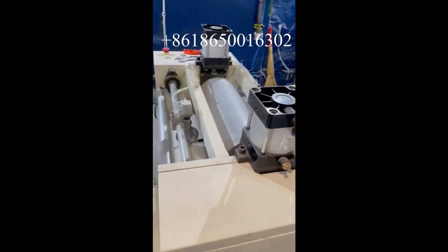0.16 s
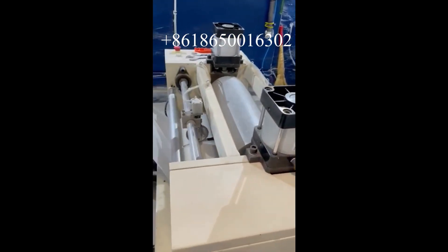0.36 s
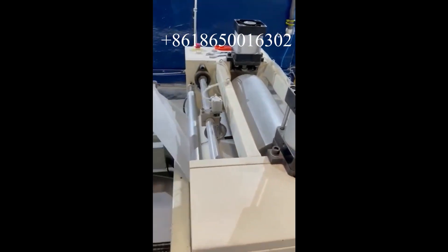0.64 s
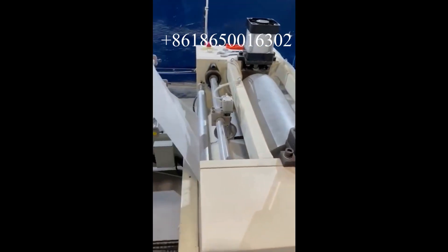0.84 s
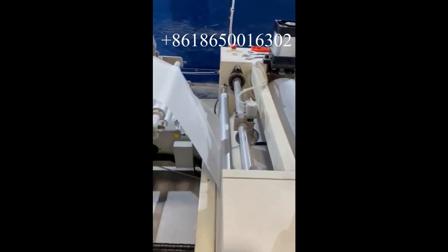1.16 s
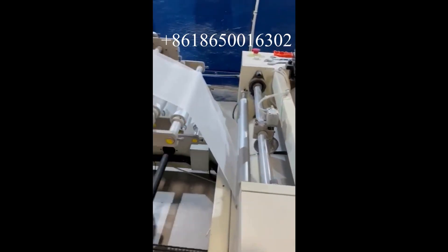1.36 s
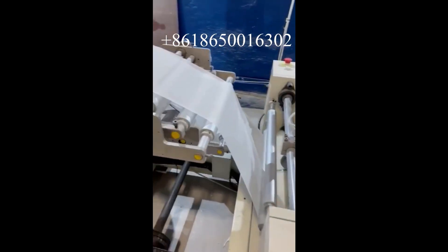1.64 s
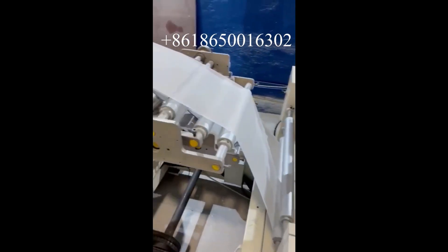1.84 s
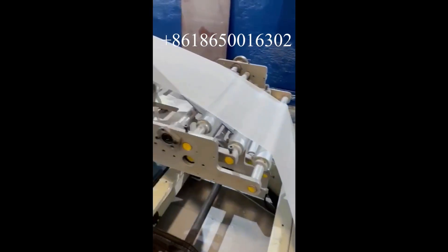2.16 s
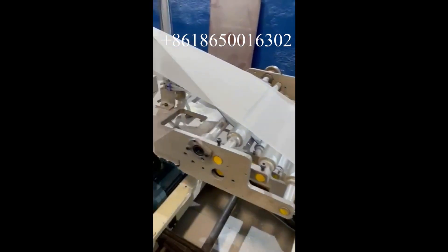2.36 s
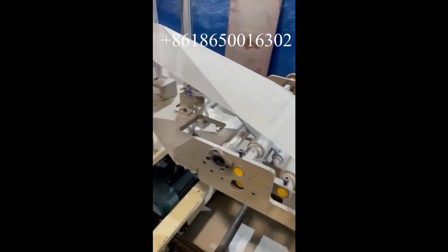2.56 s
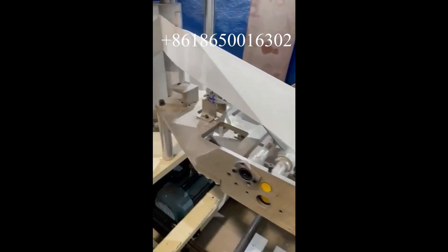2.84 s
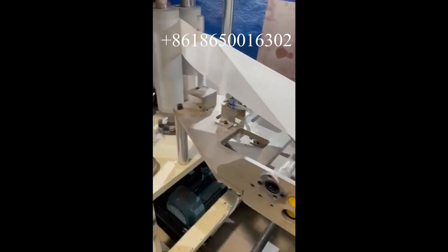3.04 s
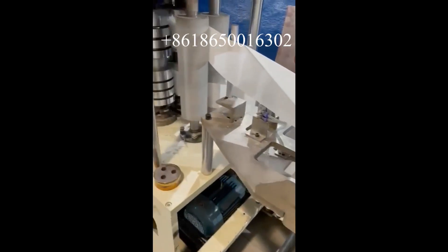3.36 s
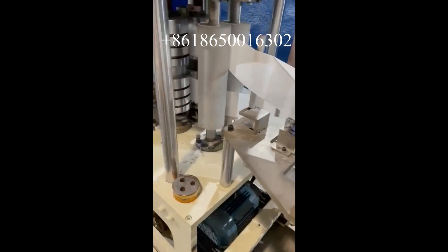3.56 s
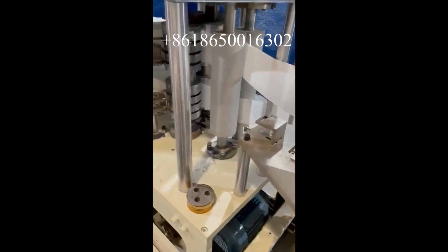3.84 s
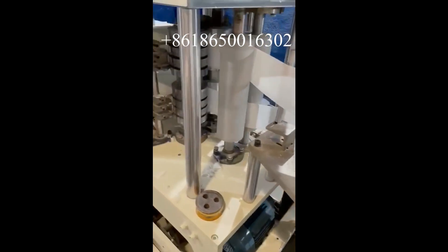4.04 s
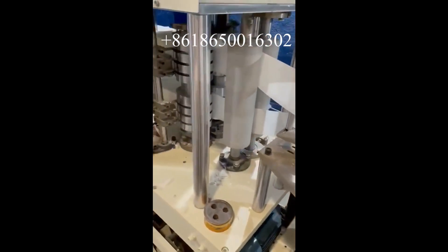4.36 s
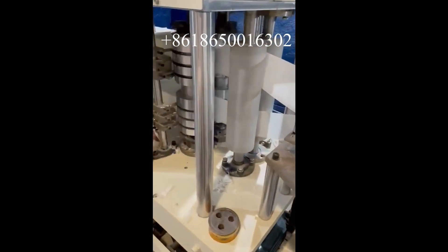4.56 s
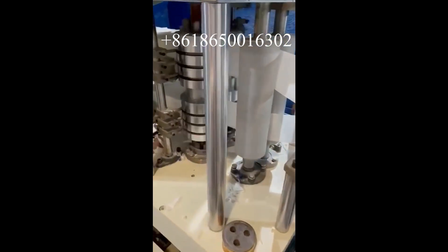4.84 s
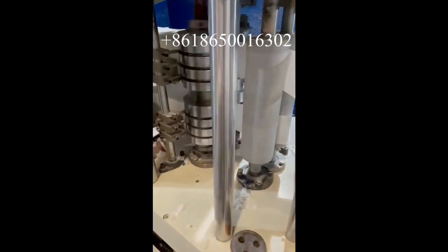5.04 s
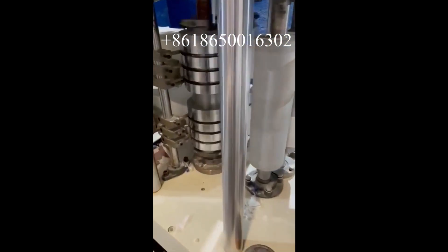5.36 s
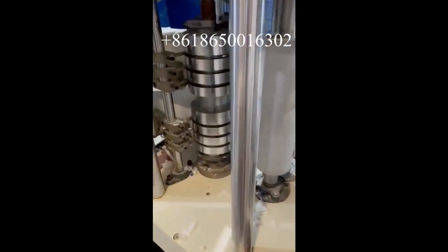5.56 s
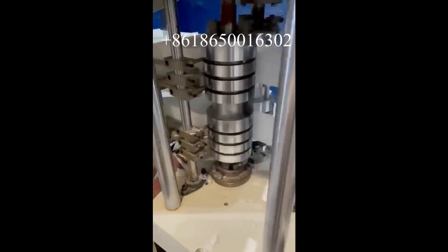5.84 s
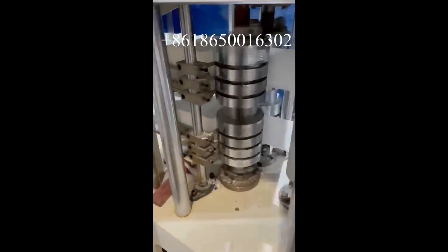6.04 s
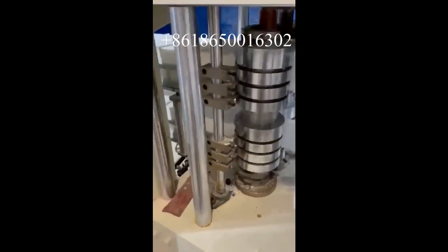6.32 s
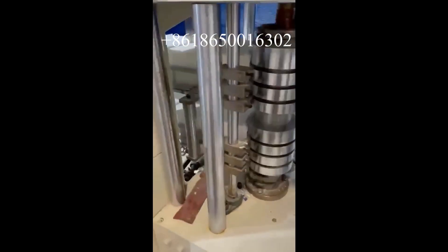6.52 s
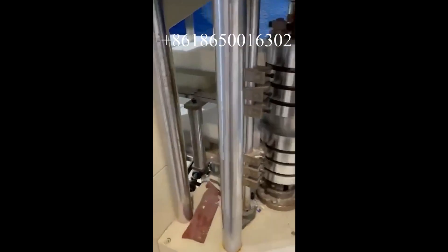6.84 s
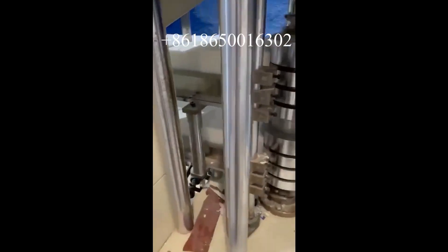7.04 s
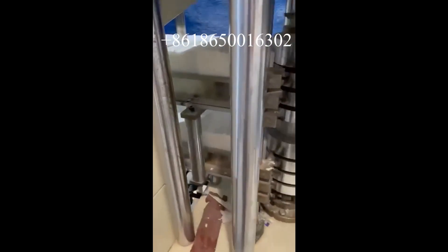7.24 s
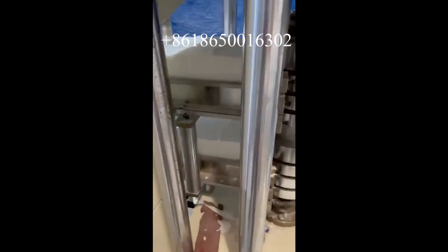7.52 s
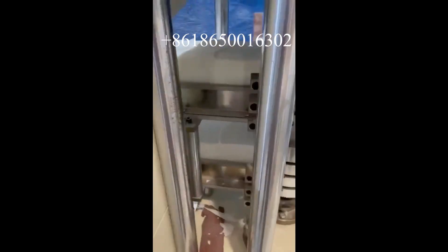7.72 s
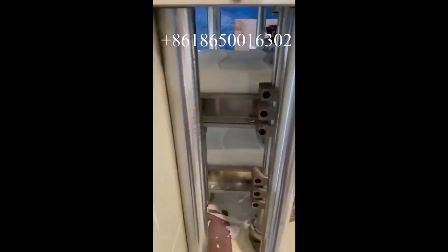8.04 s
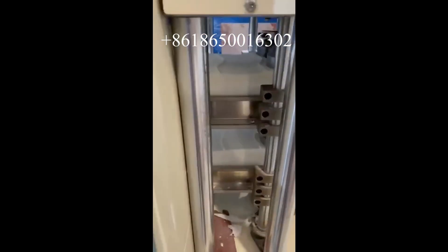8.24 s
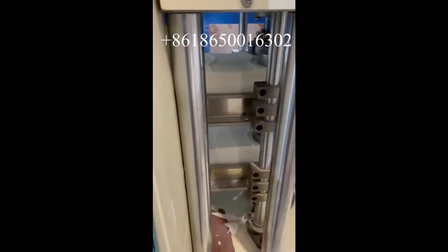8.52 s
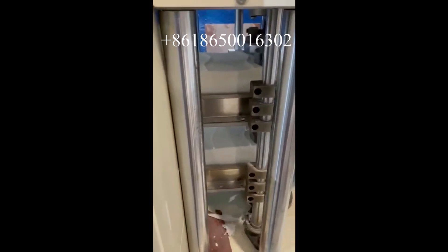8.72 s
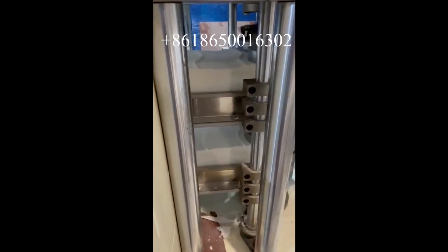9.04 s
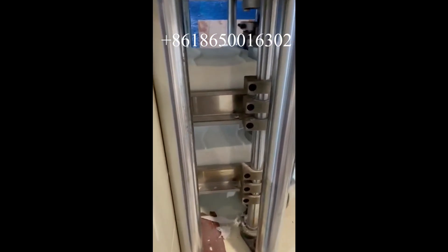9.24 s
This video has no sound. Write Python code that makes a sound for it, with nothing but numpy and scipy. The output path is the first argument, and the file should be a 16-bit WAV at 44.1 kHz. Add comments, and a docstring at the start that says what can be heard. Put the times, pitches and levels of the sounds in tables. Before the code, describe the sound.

A paper folding machine is already running at full speed in a workshop. Low gear rumble and hum throb about five times a second under hissing paper, while each cycle brings taps, paper snaps, clicks, knocks and a short swish. Just after five seconds a loose metal part rattles, the machine grows a little quieter, and a smaller rattle follows. The close handheld microphone moves from feed end to folding end.

```python
"""From the start, a paper folding and packing machine runs at five cycles a second in a workshop.
Its gear train shakes the frame with a rumble that repeats and throbs every turn, over hissing paper.
Each cycle brings a lever tap, a paper snap, a jaw click, a latch and cam knock, and a folding swish:
bursts of tiny impacts, loudest as a phone carried from feed end to folding end passes each part.
After 5 s a loose part clatters; the sound steps down a little as it ends, then a second clatter comes."""
import sys
import numpy as np
from scipy import signal
from scipy.fft import rfft, irfft, next_fast_len
from scipy.io import wavfile
from scipy.ndimage import map_coordinates

SR = 44100
rng = np.random.default_rng(int(sys.argv[2]) if len(sys.argv) > 2 else 0)


def to_wav(s):
    """Save 16-bit WAV."""
    ch = np.atleast_2d(s).T  # columns
    pcm = np.round(np.clip(ch, -1, 1) * 32767)  # PCM
    wavfile.write(sys.argv[1], SR, pcm.astype(np.int16))


N = 413658
TIME = np.arange(N) / SR  # seconds
CYCLE_HZ, CYCLE_S = 5.0178, 0.19923

# Levels along the walk, before the trims in each function. Each row: time in seconds, then the levels
# in dB of frame rumble, gear growl, roller ring, belt whirr and paper hiss.
LEVELS = [(0, -21.5, -20.5, -21, -26, -25.5), (1.6, -21, -19.5, -25, -26, -26),
          (3.6, -21, -20.5, -26, -27, -26), (5.12, -20.5, -20.5, -23.5, -28, -24.5),
          (5.3, -22.5, -23.5, -36, -31.5, -27.5), (6.3, -23.5, -21.5, -27, -32.5, -27),
          (6.9, -24.5, -19.5, -29.5, -33, -28), (7.9, -21, -21, -24.5, -34, -28),
          (8.4, -22.5, -22, -28, -35.5, -28), (9.38, -23, -21.5, -30, -33.5, -27)]
# Broad colours of the steady sounds. Each row: frequency in Hz, level in dB.
FRAME_COLOUR = [(20, -61), (45, -32), (70, -12.5), (100, -9.5), (130, -1), (200, 0.5), (250, -3.5),
                (330, -22.5), (700, -86.5)]
GEAR_COLOUR = [(120, -36), (220, -7), (280, -2.5), (390, -1.5), (430, -8), (480, -4), (540, -10),
               (700, -39.5), (1500, -56)]
ROLLER_COLOUR = [(300, -35.5), (500, -18), (560, -1), (590, 5), (625, 1.5), (690, -14), (1200, -48)]
BELT_COLOUR = [(300, -23), (520, -4.5), (680, -1), (850, -5.5), (1100, -11), (1350, -8), (1700, -20.5),
               (5000, -38)]
WEB_COLOUR = [(300, -13.5), (1000, 0), (1350, 2), (1650, 1.5), (2300, 4), (3000, -0.5), (4000, -4),
              (4700, -3), (6400, -10), (10500, -14.5), (12000, -30.5), (15000, -41)]

# The three main hums, as multiples of the cycle rate (no unit): low, middle and high.
HUM_MULTIPLES = (36, 70, 116)
# Steady hum levels along the walk. Each row: time in seconds, then low, middle and high hum in dB.
HUMS = [(0, -43, -26.5, -38), (1.7, -35.5, -30, -35.5), (3.4, -30, -32, -36), (4.9, -28.5, -31, -38),
        (5.7, -37, -42, -48), (7.3, -33, -34, -36), (9.38, -34, -33, -39)]
# Booms that return every cycle. Each row: seconds after the cycle start, multiple of the cycle rate,
# rise in seconds, decay in seconds, time when nearest in seconds, reach in seconds, peak level in dB.
THROBS = [(.204, 36, .022, .028, 4.7, 1.0, -18.5), (.204, 36, .02, .024, 1.3, 1.4, -23),
          (.13, 36, .02, .03, 4.6, .8, -23), (.122, 38, .022, .028, 7.2, 1.4, -21),
          (.005, 40, .02, .02, 7.6, 1.3, -23), (.063, 47, .014, .018, 4, 1.3, -22),
          (.066, 47, .016, .02, 7.1, .9, -19.5), (.008, 58, .014, .016, 2.5, 2.2, -23),
          (.056, 58, .014, .024, 1, 1.1, -22.5), (.089, 64, .013, .013, 4.5, 1.0, -17.5),
          (.08, 62, .01, .012, 1.2, 1.4, -23), (.087, 63, .012, .016, 7.6, 1.4, -22.5),
          (.02, 63, .014, .016, 7.8, 1.5, -22.5), (.027, 70, .01, .018, 1.2, 1.8, -18.5),
          (.116, 72, .01, .013, 1, 1.3, -22), (.153, 70, .012, .03, 1.1, 1.3, -18.5),
          (.166, 75, .016, .018, 4.5, .9, -22), (.186, 74, .014, .016, 7.8, 1.4, -24),
          (.053, 120, .005, .008, 2.8, 2.3, -20.5), (.093, 118, .006, .013, 3.4, 1.3, -19),
          (.12, 121, .007, .011, 1.5, 1.3, -24), (.191, 120, .005, .008, 3.2, 1.3, -23),
          (.16, 116, .007, .024, 3.3, 1.6, -19), (.162, 116, .008, .02, 8.2, 1.2, -19),
          (.192, 116, .006, .009, 8.2, 1.2, -23), (.058, 116, .008, .02, 8, 1.2, -24)]
# Lesser gear tones. Each row: multiple of the cycle rate, then the level in dB relative to their
# band at the feed end and at the folding end.
GEAR_TONES = [(35, -26, -17), (38, -19, -14), (46, -20, -16), (47, -17, -16), (51, -13, -21),
              (60, -14, -18), (64, -17, -18), (112, -13, -14)]

# How hard each cycle's strokes land. Each row: cycle start in seconds, then changes in dB for the tap,
# the snap, the knock (also latch and click), and the swish.
CYCLES = [(0.0003, -0.5, 1.0, 0.0, -1.0), (0.1995, -0.5, -1.0, -1.0, -1.0), (0.3988, 0.0, 0.5, -1.0, 0.5),
          (0.598, 0.0, -0.5, -1.0, -1.0), (0.7972, 1.0, -0.5, 0.0, -1.0), (0.9964, 1.0, 1.0, -1.5, 2.0),
          (1.1957, -1.5, -1.0, 1.5, 1.5), (1.3949, 0.5, -1.5, 1.0, 0.5), (1.5941, 0.5, -0.5, -0.5, -1.5),
          (1.7934, 0.5, 2.0, 1.0, -0.5), (1.9926, -1.0, 0.0, 0.5, -0.5), (2.1918, 0.0, 0.0, -0.5, -0.5),
          (2.3911, 1.0, 0.0, 0.0, 1.0), (2.5903, -1.0, 1.0, 0.0, -0.5), (2.7895, -2.0, 0.0, 1.0, 0.5),
          (2.9888, 1.5, -0.5, -1.5, 0.0), (3.188, -1.5, 0.0, 0.5, 0.0), (3.3872, -1.5, -0.5, 0.5, -0.5),
          (3.5864, 2.0, -1.5, 1.5, -1.5), (3.7857, 0.5, 0.5, 1.0, 0.5), (3.9849, 1.5, -0.5, -1.5, 1.0),
          (4.1841, 0.5, 0.0, -1.5, 0.5), (4.3834, -1.0, 1.5, -1.0, 1.0), (4.5826, 2.0, 2.5, 0.5, -1.0),
          (4.7818, 0.5, -1.5, 0.5, 1.0), (4.981, 0.0, 3.5, 0.0, 1.0), (5.1803, 1.0, -1.0, -0.5, 1.5),
          (5.3795, -1.5, -1.5, 0.5, 0.5), (5.5787, -0.5, -1.5, 1.5, -2.0), (5.778, -2.0, -0.5, -4.0, -1.5),
          (5.9772, 0.5, 1.0, 2.5, 1.0), (6.1764, 0.0, 0.5, 1.5, 0.0), (6.3757, 2.0, -0.5, 1.0, 1.5),
          (6.5749, 2.5, -1.5, 0.5, -1.5), (6.7741, -1.5, 0.0, -3.0, -0.5), (6.9733, -2.5, 2.0, 1.0, -1.0),
          (7.1726, -1.0, 0.0, 2.0, 3.0), (7.3718, -1.5, -1.5, -1.5, 2.0), (7.571, 1.5, 2.0, 1.5, -1.0),
          (7.7703, 1.5, -1.0, 1.5, 0.5), (7.9695, 0.5, 0.5, 0.0, 0.0), (8.1687, -1.0, -1.0, -3.0, -2.5),
          (8.368, 1.0, 0.0, 0.0, 0.5), (8.5672, -2.0, -1.0, 0.0, -2.0), (8.7664, 1.0, -0.5, 1.5, 0.0),
          (8.9656, 1.0, 1.0, 0.0, 1.0), (9.1649, -0.5, 0.5, -1.5, 0.0)]
# Contacts that make up each stroke. Each row: seconds after the cycle start, level in dB,
# rise in seconds, decay in seconds.
TAP = [(.042, 1.5, .0007, .0035), (.0452, 0, .001, .008)]
SNAP = [(.0805, -3.5, .0012, .004), (.087, 2, .0014, .003), (.0925, -1.5, .003, .009)]
LATCH = [(.1475, 0, .0014, .0045)]
KNOCK = [(.1485, 0, .0012, .004), (.1542, 2.5, .0015, .005), (.162, -2, .003, .012)]
CLICK = [(.1425, -8.5, .0015, .003), (.1478, -.5, .0013, .0032), (.153, 4, .0015, .003),
         (.159, -6.5, .002, .01)]
SWISH = [(.167, -7, .008, .012), (.1783, 0, .0014, .005), (.182, 1, .002, .005), (.186, .5, .002, .005),
         (.1945, 3.5, .0018, .004), (.200, -3.5, .002, .008)]
# Broad colours of the strokes. Each row: frequency in Hz, level in dB.
TAP_COLOUR = [(200, -11.5), (700, 6), (1400, 8.5), (2400, 1), (3200, -6.5), (5800, -7.5), (10500, -27),
              (15000, -30)]
SNAP_COLOUR = [(200, -14), (800, 19), (1700, 7.5), (2300, 16.5), (3000, 8), (4800, 11), (6400, 9),
               (10500, 1.5), (15000, -35)]
KNOCK_COLOUR = [(200, -7), (580, -2), (1000, -15.5), (1500, 1.5), (1900, -1), (2500, -9.5), (3500, -20),
                (7000, -21), (15000, -50)]
CLICK_COLOUR = [(200, -20.5), (1000, 2.5), (2000, 5.5), (2900, 4), (4500, -4), (6400, -4.5), (10500, -14),
                (15000, -45)]
SWISH_COLOUR = [(200, 2.5), (600, 15), (1400, 10.5), (2500, 12), (3000, 6.5), (3500, 8), (6400, 6),
                (10500, -4.5), (15000, -41)]
# Resonances of the struck parts. Each row: frequency in Hz, width in Hz, then the lift in dB heard
# from the feed end and from the folding end.
LEVER_MODES = [(1400, 89, 0, 7), (1800, 230, 4, 3), (3670, 130, 0, 9.5), (5500, 500, 3, 5.6)]
FOLDER_MODES = [(1330, 38, 5, 8.9), (2260, 360, 2, 3.7), (3460, 150, 3.9, 6.3), (4700, 130, 2.2, 9)]
CAM_MODES = [(1450, 90, 5, 5), (1850, 130, 10, 8)]
JAW_MODES = [(2900, 120, 4.4, 4.4), (3590, 460, 3, 6.4), (4700, 180, 11, 11.2), (5040, 230, 7, 4)]
GUIDE_MODES = [(2350, 400, 4.5, 1), (3580, 160, 3, 10), (4620, 280, 3, 7), (5350, 170, 5, 0.91)]
# Where the phone passes each part. Each single row: time when nearest in seconds, reach in seconds
# (its sign has no effect), direct level when nearest in dB, level heard everywhere in dB.
TAP_PASS = (5, -2, -20, -21)
SNAP_PASS = (7, 3, -20.5, -22)
LATCH_PASS = (8.5, -0.6, -21.5, -28.5)
KNOCK_PASS = (2.4, 1.6, -21, -27)
CLICK_PASS = (7.5, 2, -14.8, -38)
SWISH_PASS = (6.5, 3, -17.5, -26.5)
CAM_RING_PASS = (1.9, 1.4, -21, -38)
# Pings of the cam follower after its knock. Each row: frequency in Hz, level in dB,
# time to fall by 60 dB in seconds.
CAM_RING = [(1490, -7, .08), (1825, -3, .09), (1875, 0, .11)]
CAM_RING_S, CAM_RING_RISE_S = .149, .003  # delay after the cycle start, and rise
STROKES_DB = -.7
STEP_S, STEP_DB = 5.19, -3.5  # the strokes step down once

# Hits of the two clatters. Each row: time in seconds, level in dB, rise in seconds, decay in seconds.
CLATTER = [(5.159, -15, .0006, .002), (5.1642, -8.5, .0006, .003), (5.171, -8, .0006, .003),
           (5.175, -6.5, .0006, .0045), (5.183, -18, .002, .017), (5.463, -21, .002, .004),
           (5.4685, -9.5, .0006, .0035), (5.4745, -11.5, .0008, .0035), (5.481, -19, .002, .014)]
# Broad colour of the clatter. Each row: frequency in Hz, level in dB.
CLATTER_COLOUR = [(200, -25), (800, 7), (1400, 4.5), (2000, 9), (2800, 5.5), (4200, 1.5), (6400, -3),
                  (10500, -12.5), (12500, -20), (15000, -18)]
# Resonances of the clatter. Each row: frequency in Hz, width in Hz, lift in dB.
CLATTER_MODES = [(1854, 29, 11), (2820, 130, 1.6), (3190, 120, 8.5), (10060, 2200, 9.4)]
# Ringing of the loose steel part. Each row: frequency in Hz, level in dB,
# time to fall by 60 dB in seconds.
CLATTER_RING = [(1835, 7, 0.21), (3070, 4, 0.2), (3610, -9, 0.23), (3870, 1, 0.17)]
RING_DB = -8

# Treble level of the paper web along the walk. Each row: time in seconds, level in dB.
WEB_SHADE = [(0, -1.5), (3, -1), (5, -1.2), (5.7, -3.4), (9.38, -3.5)]
FLUTTER_HZ, FLUTTER_DB = 260, 1.4
COVER_DELAY_S, COVER_SWAY, COVER_DB = .0011, .25, -11  # sway: spread of the delay's natural log
ROOM_T60_S, ROOM_DB = 0.066, -7.5  # time to fall by 60 dB, and level
# Colour of faint air movement between the microphone ports. Each row: frequency in Hz, level in dB.
AIR_COLOUR = [(20, -12), (60, 7), (120, -13), (300, -32), (3000, -70)]
# Treble colour as heard: dips near 7.8 and 12.9 kHz and a falling top.
# Each row: frequency in Hz, level in dB.
HEARD_COLOUR = [(20, 0.5), (6500, -0.5), (7200, -41.5), (8400, -32), (9100, -2.5), (11400, 4), (12100, -13),
                (12900, -35), (14300, -9), (15500, -20)]
TOP_HZ = 15300


def gear_train(frame_db, gear_db, roller_db, belt_db):
    """Repeating tooth contacts shake the frame, gears, rollers and belts, each with its own colour."""
    frame = undb(frame_db - 5.0) * body(rattling(loose_db=9.0, slow_db=-3.5), FRAME_COLOUR)
    gears = undb(gear_db - 2.5) * body(rattling(loose_db=2, slow_db=-4.0), GEAR_COLOUR)
    rollers = undb(roller_db - 6.5) * body(rattling(loose_db=-1.0, slow_db=-7.0), ROLLER_COLOUR)
    belts = undb(belt_db + 3.5) * body(rattling(loose_db=5.5, slow_db=-4.5), BELT_COLOUR)
    return frame + gears + rollers + belts


def rattling(loose_db, slow_db):
    """Tooth contacts, a half-speed shaft and loose play; the pattern shifts as the listener moves."""
    angle = np.pi * TIME / TIME[-1]
    teeth = np.cos(angle) * one_turn() + np.sin(angle) * one_turn()
    half_speed_shaft = undb(slow_db) * one_turn(count=2)
    loose_play = undb(loose_db) * rng.standard_normal(N)
    return unit(teeth + half_speed_shaft + loose_play)


def one_turn(count=1):
    """Tooth contacts, as noise that comes back alike every count cycles."""
    size = int(round(count * SR / CYCLE_HZ))
    phases = 2j * np.pi * rng.random(size // 2 + 1)
    turn = irfft(np.exp(phases), size)
    return unit(np.resize(turn, N))


def hums():
    """Meshing teeth hum; each stroke's load makes them boom once a cycle, on stretches of the walk."""
    power = {multiple: undb(db) ** 2 for multiple, db in zip(HUM_MULTIPLES, curves(HUMS))}
    for s, multiple, rise, decay, nearest_s, reach_s, db in THROBS:
        # time since the boom's peak, wrapped to half a cycle either side
        age = (TIME - s + CYCLE_S / 2) % CYCLE_S - CYCLE_S / 2
        swell = np.exp(np.where(age < 0, -(age / rise) ** 2, -age / decay))
        near = np.exp(-.5 * ((TIME - nearest_s) / reach_s) ** 2)
        power[multiple] = power.get(multiple, 0) + (undb(db) * swell * near) ** 2
    return sum(np.sqrt(p) * tone(multiple, 0, waver_db=1.5, waver_rad=.5)
               for multiple, p in power.items())


def gear_tones(band_db, gain_db):
    """Lesser gear tones swell with their part of the drive; their balance changes along the machine."""
    place = TIME / TIME[-1]
    out = 0
    for multiple, feed_db, fold_db in GEAR_TONES:
        # frame below 260 Hz, gears up to 500 Hz, rollers above
        part_db = band_db[np.searchsorted([260, 500], multiple * CYCLE_HZ)]
        out = out + tone(multiple, part_db + feed_db + (fold_db - feed_db) * place)
    return undb(gain_db) * out


def tone(multiple, db, waver_db=3.0, waver_rad=0.41):
    """A tone of meshing teeth, locked to the cycle, wavering in level and pitch."""
    phase = 2 * np.pi * (multiple * CYCLE_HZ * TIME + rng.random()) + waver_rad * drift(6)
    return np.sqrt(2) * undb(db + waver_db * drift(4)) * np.sin(phase)


def all_strokes():
    """The six moving parts strike in every cycle and step down in level once."""
    tap, snap, knock, swish = range(1, 5)  # columns of CYCLES
    strokes = (stroke(TAP, TAP_COLOUR, LEVER_MODES, TAP_PASS, tap, grit_db=3.5)
               + stroke(SNAP, SNAP_COLOUR, FOLDER_MODES, SNAP_PASS, snap, grit_db=2.0)
               + stroke(LATCH, KNOCK_COLOUR, CAM_MODES, LATCH_PASS, knock, grit_db=-1.0)
               + stroke(KNOCK, KNOCK_COLOUR, CAM_MODES, KNOCK_PASS, knock, grit_db=4.0)
               + stroke(CLICK, CLICK_COLOUR, JAW_MODES, CLICK_PASS, knock, grit_db=3.0)
               + stroke(SWISH, SWISH_COLOUR, GUIDE_MODES, SWISH_PASS, swish, grit_db=3.0))
    return strokes * undb(STROKES_DB + STEP_DB * (TIME > STEP_S))


def stroke(pattern, colour, modes, place, column, grit_db,
           play_s=0.00031, scatter_db=-0.07, bright_db=1.6):
    """One part strikes once a cycle with a little play; its resonances shift in strength on the walk."""
    chance = rng.standard_normal((len(CYCLES), len(pattern), 2))
    rows = []
    for cycle, draws in zip(CYCLES, chance):
        for (s, db, rise, decay), (shift, hard) in zip(pattern, draws):
            if cycle[0] + s < N / SR:
                hit_s = cycle[0] + s + play_s * shift
                hit_db = cycle[column] + db + scatter_db * hard
                rows.append((hit_s, hit_db, rise, decay))
    force = contacts(rows) * grit(grit_db)
    at_feed = body(force, colour, [(hz, width, db) for hz, width, db, _ in modes])
    at_fold = body(force, colour, [(hz, width, db) for hz, width, _, db in modes])
    ring = passing(*place) * (at_feed + (at_fold - at_feed) * TIME / TIME[-1])
    # small parts radiate no deep bass
    ring = signal.sosfilt(signal.butter(2, 130, "high", fs=SR, output="sos"), ring)
    # no two blows land alike: one comes out brighter, the next duller
    dull = signal.sosfiltfilt(signal.butter(2, 3000, fs=SR, output="sos"), ring)
    tilt_db = bright_db * drift(20)
    return undb(-tilt_db / 2) * dull + undb(tilt_db) * (ring - dull)


def contacts(rows, size=6000, lead=1000):
    """Contacts swell briefly, peak and die away; their powers add (size and lead in samples)."""
    power = np.zeros(N + 2 * size)
    age = (np.arange(size) - lead) / SR
    for s, db, rise, decay in rows:
        start = max(int(s * SR), 0)
        shape = np.exp(-np.abs(age) / np.where(age < 0, rise, decay))
        power[start:start + size] += (undb(db) * shape) ** 2
    return np.sqrt(power[lead:lead + N])


def grit(spread_db):
    """Dense tiny impacts of unequal size."""
    chance = rng.standard_normal((2, N))
    return unit(chance[0] * undb(spread_db * chance[1]))


def passing(nearest_s, reach_s, near_db, far_db):
    """Direct sound falls with distance as the phone walks by, over a level that fills the room."""
    distance = np.hypot(1, (TIME - nearest_s) / reach_s)
    return np.hypot(undb(near_db) / distance, undb(far_db))


def cam_ring():
    """Each knock leaves a short, clear ping in the cam follower, with a slightly varying pitch."""
    out = np.zeros(N + SR)
    age = np.arange(SR // 8) / SR
    chance = rng.standard_normal((len(CYCLES), len(CAM_RING)))
    for (start, _, _, force_db, _), draws in zip(CYCLES, chance):
        ping = 0
        for (hz, db, t60), detune in zip(CAM_RING, draws):
            wave = np.sin(2 * np.pi * hz * (1 + .006 * detune) * age)
            ping = ping + undb(db - 60 * age / t60) * wave
        first = int((start + CAM_RING_S) * SR)
        out[first:first + len(age)] += undb(force_db) * ping * (1 - np.exp(-age / CAM_RING_RISE_S))
    return passing(*CAM_RING_PASS) * out[:N]


def clatter(size=16384):
    """A loose part rattles hard, and its steel rings on briefly."""
    force = contacts(CLATTER) * grit(4.5)
    age = np.arange(size) / SR
    ring = sum(undb(db - 60 * age / t60) * np.sin(2 * np.pi * hz * age)
               for hz, db, t60 in CLATTER_RING)
    rattle = body(force, CLATTER_COLOUR, CLATTER_MODES)
    ringing = signal.oaconvolve(force, ring / np.linalg.norm(ring))[:N]
    return rattle + undb(RING_DB) * ringing


def paper_web(web_db):
    """The paper web flutters and hisses over its guides, as dense tiny crinkles of uneven level."""
    flutter_db = 1.0 * drift(11) + FLUTTER_DB * drift(FLUTTER_HZ)
    hiss = undb(web_db + flutter_db) * body(grit(5.2), WEB_COLOUR)
    return shaded(off_covers(hiss))


def shaded(x):
    """The folding tower screens the treble of the paper web."""
    dull = signal.sosfiltfilt(signal.butter(2, 1900, fs=SR, output="sos"), x)
    return dull + undb(curves(WEB_SHADE)[0]) * (x - dull)


def off_covers(x):
    """A steel cover echoes once; the delay shifts as the phone moves and hollows out changing bands."""
    delay_s = COVER_DELAY_S * np.exp(COVER_SWAY * drift(1.5))
    echo = map_coordinates(x, [(TIME - delay_s) * SR], order=3, mode="mirror")
    return (x + undb(COVER_DB) * echo) / np.hypot(1, undb(COVER_DB))


def workshop(x, size=16384, count=7):
    """Reflections from covers and walls; their pattern changes from place to place along the walk."""
    age = np.arange(size) / SR
    out = 0
    for k in range(count):
        fade = undb(-60 * age / ROOM_T60_S) * (1 - np.exp(-age / 0.0029))
        tail = rng.standard_normal(size) * fade
        # neighbouring places crossfade along the walk
        share = np.sqrt(np.maximum(1 - np.abs(TIME / TIME[-1] * (count - 1) - k), 0))
        out = out + share * signal.oaconvolve(x, tail / np.linalg.norm(tail))[:N]
    return out


def port_air():
    """Faint air movement between the microphone ports, as low steady noise."""
    return undb(-75) * body(rng.standard_normal(N), AIR_COLOUR)


def body(x, points, modes=(), size=4096):
    """Causal filter of unit power: a broad colour with resonances standing out of it."""
    f = np.arange(size // 2 + 1) * SR / size + 1
    hz, db = np.transpose(points)
    gain = undb(np.interp(np.log(f), np.log(hz), db))
    for centre, width, lift_db in modes:
        gain = gain * (1 + (undb(lift_db) - 1) / (1 + (2 * (f - centre) / width) ** 2))
    # folding the cepstrum makes the filter respond as early as it can (minimum phase)
    cepstrum = irfft(np.log(gain))
    cepstrum[1:size // 2] *= 2
    cepstrum[size // 2 + 1:] = 0
    response = irfft(np.exp(rfft(cepstrum)))
    return signal.oaconvolve(x, response / np.linalg.norm(response))[:N]


def drift(rate):
    """Random wander with a spread near 1, in straight lines between rate new values a second."""
    knots = rng.standard_normal(int(N / SR * rate) + 2)
    return 1.41 * np.interp(TIME * rate, np.arange(len(knots)), knots)


def curves(rows):
    """Each column of a table, joined by straight lines in time."""
    s, *columns = np.transpose(rows)
    return [np.interp(TIME, s, c) for c in columns]


def unit(x):
    """Scale to an rms (average strength) of 1."""
    return x / np.sqrt(np.mean(x ** 2))


def undb(db):
    """Decibels to gain."""
    return 10 ** (np.asarray(db) / 20)


def scene():
    """The whole machine, almost in the middle; the treble leans right and spreads a little."""
    frame_db, gear_db, roller_db, belt_db, web_db = curves(LEVELS)
    drive = gear_train(frame_db, gear_db, roller_db, belt_db) + hums()
    drive = drive + gear_tones([frame_db, gear_db, roller_db], gain_db=1)
    impacts = off_covers(all_strokes()) + clatter()
    mid = drive + impacts + cam_ring() + paper_web(web_db) + undb(ROOM_DB) * workshop(impacts)
    treble = signal.sosfiltfilt(signal.butter(3, 950, "high", fs=SR, output="sos"), mid)
    spread = undb(-23.5) * workshop(treble, count=2)
    lean_right = -undb(-24.5) * treble
    side = spread + lean_right + port_air()
    return np.array([mid + side, mid - side])  # left, right


def record(dry):
    """The highest peaks are rounded, the treble has two dips, and the top is cut."""
    size = next_fast_len(N + 4096)
    hz, db = np.transpose(HEARD_COLOUR)
    gain = undb(np.interp(np.arange(size // 2 + 1) * SR / size, hz, db))
    rounded = dry / (1 + (dry / .85) ** 4) ** .25
    heard = irfft(rfft(rounded, size) * gain, size)[:, :N]
    return signal.sosfilt(signal.ellip(8, .2, 70, TOP_HZ, fs=SR, output="sos"), heard)


dry = scene()
out = record(dry)
to_wav(out)
```